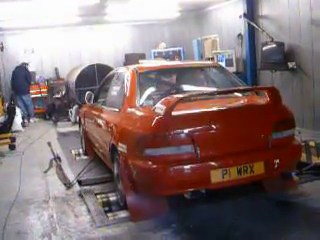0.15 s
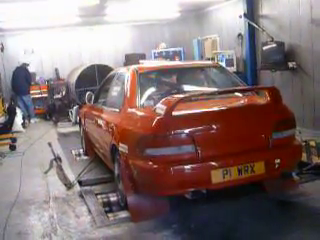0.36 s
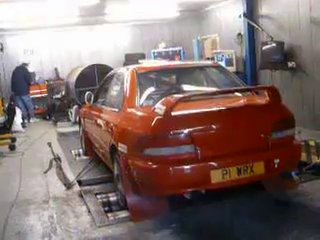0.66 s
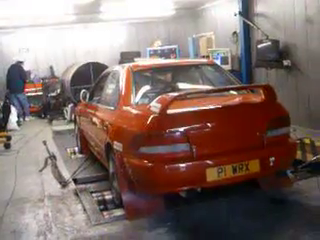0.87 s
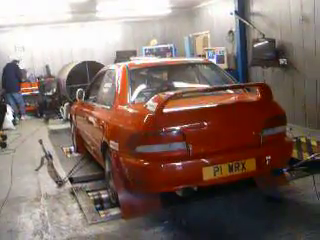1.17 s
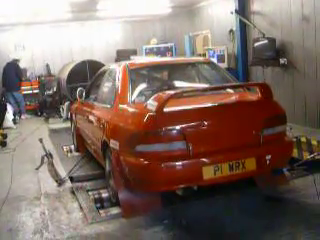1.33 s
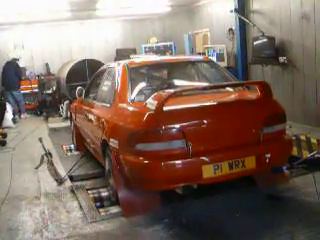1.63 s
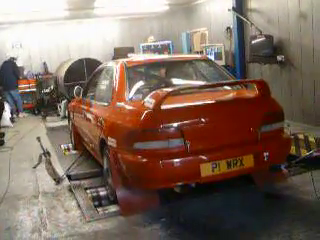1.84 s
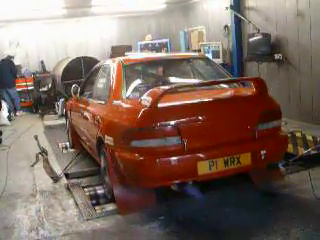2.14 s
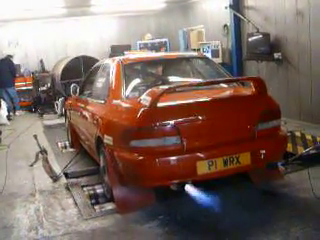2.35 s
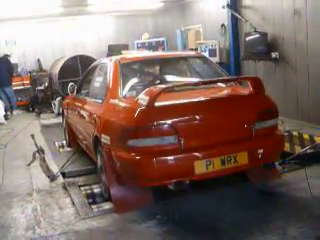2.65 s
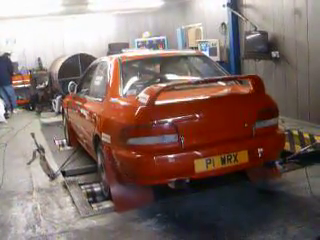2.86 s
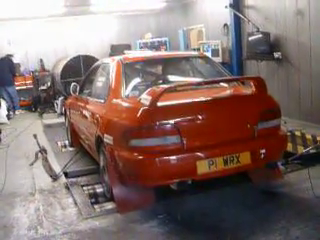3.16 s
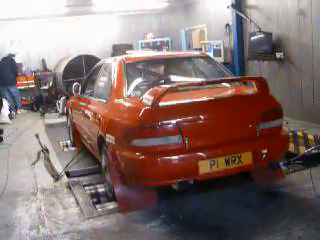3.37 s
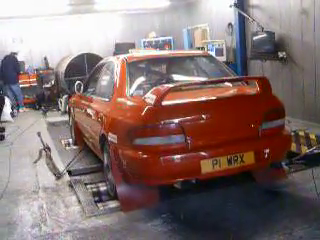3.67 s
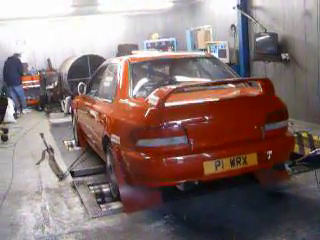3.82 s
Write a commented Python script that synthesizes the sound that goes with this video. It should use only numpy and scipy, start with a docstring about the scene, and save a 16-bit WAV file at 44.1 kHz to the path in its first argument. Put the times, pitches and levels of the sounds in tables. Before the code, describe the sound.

A car engine pulls on workshop rollers from 0 seconds, its uneven, raspy throb growing louder and rising slightly in pitch until 1.8. The throttle shuts and exhaust bangs erupt, with a huge crack at 2.0, a dense cluster to 2.5, weaker pops, and another violent bang at 3.1. From 3.2 the engine picks up quietly. Fan rush continues throughout; the close microphone clips on the loudest bangs.

```python
"""Flat-four on a dynamometer

A turbocharged flat-four pulls hard in a workshop, heard from behind the tailpipe. Its uneven firings
drive a throb of summed cycle harmonics, and a roar and rasp of noise bursts. The throttle shuts, unburnt
fuel bangs (pulse, pipe ring, crack) and the loudest peaks are clipped flat; two of the bangs whistle. The
engine picks up on a light throttle. A cooling fan of coloured noise and faint sines runs throughout."""
import sys
import numpy as np
from scipy import signal
from scipy.fft import rfft, irfft
from scipy.io import wavfile
from scipy.ndimage import uniform_filter1d, map_coordinates

SR = 44100
rng = np.random.default_rng(int(sys.argv[2]) if len(sys.argv) > 2 else 0)


def store_wav(level_fs):
    """Save 16-bit WAV to argv[1]."""
    pcm = np.round(np.clip(np.atleast_2d(level_fs), -1, 1) * 32767)
    wavfile.write(sys.argv[1], SR, pcm.T.astype(np.int16))


N = 176400


def undb(db):
    """Decibels to gain."""
    return 10 ** (np.asarray(db) / 20)


def unit(x):
    """Scale to rms 1."""
    return x / np.sqrt(np.mean(x ** 2))


def curve(table, t):
    """Every column after the first, joined by straight lines."""
    rows = np.array(table, float)
    return [np.interp(t, rows[:, 0], column) for column in rows.T[1:]]


def causal(db):
    """Minimum-phase response with these levels, so that it rings only after its cause."""
    cepstrum = irfft(np.log(undb(db)))
    half = len(cepstrum) // 2
    cepstrum[1:half] *= 2
    cepstrum[half + 1:] = 0
    return np.exp(rfft(cepstrum))


def colour(x, points):
    """Filter through (frequency [Hz], level [dB]) points, then scale to rms 1."""
    hz, db = np.array(points, float).T
    f = np.maximum(np.fft.rfftfreq(N, 1 / SR), 1)
    response = causal(np.interp(np.log(f), np.log(hz), db))
    return unit(irfft(rfft(x) * response, N))


def walk(hz):
    """Smooth random wander of about rms 1, heading for a new value hz times a second."""
    hold = int(SR / hz)
    steps = np.repeat(rng.standard_normal(N // hold + 1), hold)
    return unit(uniform_filter1d(steps, hold))[:N]


# Engine cycles of two crank turns each, for pull, coast and pick-up: (time [s], cycle rate [Hz])
PULL_RATE = [(0.0, 31.65), (0.2, 31.62), (0.4, 32.23), (0.7, 33.14), (1.0, 34.08), (1.3, 35.2),
             (1.6, 36.55), (1.72, 36.96), (1.84, 36.85)]
COAST_RATE = [(1.951, 36.21), (2.299, 34.98), (2.65, 33.14), (2.9, 31.64), (3.1, 30.56)]
PICKUP_RATE = [(3.25, 30.12), (3.45, 30.06), (3.6, 30.21), (3.8, 30.87), (4.0, 31.26)]
# One strong firing in the pull and one in the pick-up: (time [s], time [s])
STRONG_FIRING_S = (1.611, 3.309)
TIMING_JITTER_CYCLES = .0012


def crank(t):
    """Count engine cycles from the crank's rate, so that the strong firings fall near whole numbers."""
    rate, = curve(list(PULL_RATE) + list(COAST_RATE) + list(PICKUP_RATE), t)
    cycle = np.cumsum(rate) / SR
    offsets = np.unwrap(np.interp(STRONG_FIRING_S, t, cycle) % 1, period=1)
    # the correction slides from one anchor to the other during the coast
    correction = np.interp(t, [COAST_RATE[0][0], COAST_RATE[-1][0]], offsets)
    return cycle - correction + TIMING_JITTER_CYCLES * walk(120)


# The four firings of a cycle: (place [share of the cycle], then strength at load 1, 2, 3, 4, 5 [dB])
CYLINDERS = [(-.02, -0.5, -2, -7, -1, 0.5), (.24, -6, -9, 1.5, -3.5, -9), (.48, -2, -20, -13.5, -17, -12.5),
             (.75, -13.5, -2.5, -16.5, -11, -9.5)]
SHOCK_WIDTH_S, SHOCK_SCATTER_DB = .00003, 1
BURST_DECAY_CYCLES, BURST_FLOOR = 0.074, 0.21


def firings(cycle, load):
    """Four unequal firings per cycle: each is a sharp shock front, then a dying burst of gas."""
    mean_rate = np.mean(np.gradient(cycle)) * SR
    shocks, bursts = 0, BURST_FLOOR
    for place, *levels in CYLINDERS:
        strength = undb(np.interp(load - 1, np.arange(len(levels)), levels))
        from_front_s = ((cycle - place + .5) % 1 - .5) / mean_rate
        since_firing = (cycle - place) % 1
        shocks = shocks + strength * np.exp(-(from_front_s / SHOCK_WIDTH_S) ** 2)
        bursts = bursts + strength * np.exp(-since_firing / BURST_DECAY_CYCLES)
    return shocks * undb(SHOCK_SCATTER_DB * walk(60)), bursts


LOWEST_ORDER, HIGHEST_ORDER = 3, 28  # multiples of the cycle rate
# Throb balance, one row per order from the lowest up: (relative level at load 1, 2, 3, 4, 5 [dB])
ORDER_LEVELS = [(-25, -13, -17, -20, -23), (-20, -1.5, 3, -3.5, -8.5), (-0.5, -4, -3, -14.0, -14.0),
                (-41, -28, -14.5, -13.5, -21.5), (-9, -17.5, -13, -16.0, -25.0), (-0.5, 1.5, 0, 2.5, -5),
                (-18, -10.0, -1, -8.5, -10), (-19.5, -42, -35, -14, -27), (-21, -11, -10, -33, -25.0),
                (-30, -28, -12.0, -17, -10.5), (-10, -7.5, -4.5, -15, -23), (-21, -13, -35, -18.0, -16),
                (-11, -12, -21.5, -19, -25.0), (-24, -23, -14, -4, -19.0), (-10, -4, 1, -5.5, -16),
                (-21, -28.5, -37, -42, -26), (-26, -40, -27, -20, -26.0), (-17.0, -20.0, -27, -28, -17.0),
                (-36, -18, -5, 1, 1), (-20, -6, -10, -2, -19.5), (-16.0, -7.5, 0, -33, -29),
                (-21, -9, -5.0, -8.0, -35.0), (0.5, 3.5, 3.5, -20, -14.5), (-3.5, -10, -38, -32, -26),
                (-17, -14.0, -37, -22.0, -31), (-23.0, -28, -26, -33, -28)]
# Throb balance with the throttle shut: (order [multiple of the cycle rate], relative level [dB])
SHUT_ORDERS = [(3, 3), (4, 5), (5, -11), (8, -8.5), (16, -30), (23, -13), (28, -12)]
# Where in the cycle the throb gathers, by load: (place at load 1, 2, 3, 4, 5 [share of the cycle])
THROB_AT = (0.005, 0.2497, 0.257, 0.0094, 0.0047)
TONE_SMEAR, TONE_LEAD_CYCLES, TONE_FLUTTER_DB = 0.0698, .35, 0.23  # smear in radians per order squared


def tone(cycle, load, shut):
    """The throb: one pressure wave per cycle, gathered by load; the pipe delays its higher orders."""
    orders = np.arange(LOWEST_ORDER, HIGHEST_ORDER + 1)
    sizes = undb(np.column_stack([curve(SHUT_ORDERS, orders)[0], np.array(ORDER_LEVELS)]))
    sizes = sizes / np.sqrt(np.sum(sizes ** 2, axis=0) / 2)  # each column sums to rms 1
    load_steps = np.arange(len(THROB_AT)) + 1
    throb = np.zeros(N)
    for order, size in zip(orders, sizes):
        gather_phase = np.unwrap(2 * np.pi * order * np.array(THROB_AT))
        lag = np.interp(load, load_steps, gather_phase) + TONE_SMEAR * order ** 2
        level = shut * size[0] + (1 - shut) * np.interp(load, load_steps, size[1:])
        throb -= level * np.cos(2 * np.pi * order * (cycle + TONE_LEAD_CYCLES) - lag)
    return throb * undb(TONE_FLUTTER_DB * walk(90))


def gas(cycle, repeat, size=1200):
    """Turbulence: a share of its power repeats in every cycle, the rest is fresh noise."""
    pattern = rng.standard_normal(size)
    repeating = unit(map_coordinates(pattern, [cycle % 1 * size], order=3, mode="wrap"))
    share = np.clip(repeat, 0, 1)
    return np.sqrt(share) * repeating + np.sqrt(1 - share) * rng.standard_normal(N)


# Throttle while open: (time [s], load [1 light, 2 part, 3 high, 4 hard, 5 and above full])
LOAD = [(.35, 2.4), (.6, 3.02), (1.0, 3.34), (1.18, 4.22), (1.33, 4.16), (1.52, 5), (1.95, 6.1), (3.0, 1.2)]
# Throttle closing: (starts to shut [s], is shut [s], starts to open [s], is open [s])
THROTTLE_SHUT_S = (1.84, 1.88, 3.1, 3.22)
# Exhaust strength: (time [s], tone level [dB], gas roar level [dB], rasp level [dB])
EFFORT = [(0, -29, -29.5, -35.5), (.2, -25, -26.5, -32), (.4, -22.5, -22, -29), (.75, -16, -25, -25),
          (1.15, -14, -19.5, -25), (1.5, -13.5, -24.5, -26.5), (1.84, -15, -18, -29),
          (1.875, -34, -30, -35.5), (2.05, -30, -35, -39), (2.2, -36.5, -38.5, -55),
          (2.65, -37.5, -36, -49), (3.1, -38.5, -38.5, -45.5), (3.17, -37.5, -30, -37.5),
          (3.27, -31.5, -35.5, -44), (3.5, -28.5, -35, -39.5), (3.7, -25.5, -33, -38), (4, -27, -28.5, -35)]
# Colour of the gas roar: (frequency [Hz], relative level [dB])
ROAR_COLOUR = [(40, -36), (80, -36), (130, -7.5), (280, -2.5), (450, 1.5), (580, 5), (670, -4.5), (780, 16),
               (860, 3.5), (1000, -2.5), (1300, -31.5), (2500, -41)]
# Colour of the rasp: (frequency [Hz], relative level [dB])
RASP_COLOUR = [(600, -28), (950, -7), (1180, -1.5), (1320, -3), (1480, 1), (1570, 8), (1670, 5), (1850, -4),
               (2100, -9.5), (2320, 4), (2480, -10), (2850, 3), (3080, 3), (3280, 4.5), (3600, -9.5),
               (5000, -19.5), (8000, -16.5), (11000, -23.5)]
# Rasp off the floor and near walls: (delay [ms], level [dB])
RASP_ECHOES = [(3.3, -7.5), (10.3, -7.5), (14, -14.5)]
ROAR_REPEAT, RASP_REPEAT = 0.35, 0.84  # share of the turbulence that is the same in every cycle
SHOCK_DB = -5.5  # relative to the turbulence in the rasp


def engine(t):
    """Exhaust tone, gas roar and rasp, all locked to the engine cycle; floor and walls repeat the rasp."""
    cycle = crank(t)
    load, = curve(LOAD, t)
    shut = np.interp(t, THROTTLE_SHUT_S, [0, 1, 1, 0])
    tone_db, roar_db, rasp_db = curve(EFFORT, t)
    shocks, bursts = firings(cycle, load)
    roar = colour(np.sqrt(bursts) * gas(cycle, ROAR_REPEAT), ROAR_COLOUR)
    fronts = undb(SHOCK_DB) * unit(shocks) * (1 - shut)
    turbulence = unit(bursts * gas(cycle, RASP_REPEAT))
    rasp = colour(fronts + turbulence, RASP_COLOUR)
    echoes = sum(undb(db) * np.roll(rasp, int(ms * SR / 1000)) for ms, db in RASP_ECHOES)
    rasp = unit(rasp + echoes)
    throb = tone(cycle, load, shut)
    return undb(tone_db) * throb + undb(roar_db) * roar + undb(rasp_db) * rasp


# Colour of the fan's rush: (frequency [Hz], relative level [dB])
FAN_COLOUR = [(15, -47), (25, -20.5), (124, -2), (219, -2.5), (631, -7.5), (776, -15.5), (1340, -18),
              (1600, -18.5), (3130, -19), (4730, -24.5), (6130, -26), (9510, -26), (12000, -26.5),
              (15600, -61), (22000, -120)]
# Faint steady tones: (frequency [Hz], rms level [dB])
WHINE = [(5200, -63.5), (6316, -61.5), (9419, -62.5)]
FAN_DB, FAN_WANDER_DB = -38.5, 0.85


def fan(t):
    """The rush of the cooling fan and rollers, slowly wandering noise, with a whine of steady sines."""
    level = undb(FAN_DB + FAN_WANDER_DB * walk(4.4))
    rush = level * colour(rng.standard_normal(N), FAN_COLOUR)
    whine = sum(undb(db) * np.sqrt(2) * np.sin(2 * np.pi * hz * t) for hz, db in WHINE)
    return rush + whine


# Exhaust bangs: (time [s], pressure pulse level [dB], pulse width [ms], pipe ring level [dB],
# crack level [dB], crack decay [ms])
BANGS = [(1.802, -7, 0.95, -13, -22, 7.5), (1.816, -25, 0.42, -32, -14, 4.7),
         (1.837, -3, 0.59, -6.5, -20.5, 7.4), (2.0135, 8, 0.72, 2.5, -6, 3.6),
         (2.03, -17, 0.73, -24, -12, 9), (2.065, -21, 1, -30, -38, 2.9), (2.1225, -6, 0.83, -11, -18, 4.1),
         (2.219, -20.5, 1, -28, -36, 3), (2.253, -15, 0.94, -29, -36, 2.8),
         (2.278, -12.5, 0.75, -21, -34, 5.8), (2.3074, -6.5, 0.74, -11.5, -30, 3.7),
         (2.3361, -15, 1, -13, -30, 4.6), (2.3646, 0, 0.55, -16, -14, 4.3), (2.3758, -1, 0.96, -2, -22, 10),
         (2.428, -36, 1, -32, -33, 6), (2.4701, -5, 0.8, -10, -18, 8.1), (2.548, -30, 0.84, -22, -39, 3.4),
         (2.567, -34, 1, -16, -34, 5.7), (2.637, -22, 1, -22.5, -30.5, 7.2),
         (2.695, -19.5, 1, -12, -29.5, 13), (2.7358, -16, 0.38, -9, -17.5, 6.9),
         (2.75, -11.5, 1, -13.5, -29.5, 18), (2.781, -19.5, 0.95, -19, -41, 7.8),
         (2.88, -14, 1, -10, -29.5, 12), (2.9047, -29, 0.74, -8.5, -25, 7.9),
         (2.918, -21, 0.6, -14, -26, 4.6), (2.9926, -22, 0.82, -16, -15.5, 3.6),
         (3.064, -24, 1, -36, -44, 3), (3.1254, 5.5, 0.49, 3, -0.5, 3.14), (3.155, -16.5, 1, -16, -39, 5),
         (3.168, -30, 0.44, -26, -27, 2.3), (3.179, -32, 0.39, -16, -25.5, 3)]
# Tailpipe modes: (frequency [Hz], relative level [dB], 60 dB decay [ms])
PIPE_MODES = [(778, 2.5, 32.3), (876, 1.5, 28), (542, -12, 53), (1088, -8, 25), (243, -5.5, 35)]
# Colour of the crack: (frequency [Hz], relative level [dB])
CRACK_COLOUR = [(200, 4.5), (900, -2.5), (1900, 3), (2400, -4.5), (3200, 2.5), (4200, -11), (6000, -17),
                (9000, -18.5), (12000, -28)]
RING_BUILD_MS, CRACK_BUILD_MS, CRACK_LEAD_MS = 4.4, 0.79, 0.9
# a bang's suction ends in a steep front (steepening and edge in shares of the pulse width)
PULSE_LEAN, PULSE_STEEPEN, PULSE_EDGE = 0.43, 0.34, 0.17


def bangs(t, size=6000):
    """Each bang is a pressure pulse, a crack of gas and the ring of the tailpipe."""
    out = np.zeros(N)
    hiss = colour(rng.standard_normal(N), CRACK_COLOUR)
    for at, pulse_db, width_ms, ring_db, crack_db, decay_ms in BANGS:
        start = int(at * SR) - size // 10
        span = slice(start, start + size)
        seconds = t[span] - at
        ms = seconds * 1000
        after = np.maximum(ms, 0)
        burning = np.maximum(ms + CRACK_LEAD_MS, 0)

        # time in pulse widths, hurried through the steep front
        u = ms / width_ms
        u = u + PULSE_STEEPEN * (1 + np.tanh((u - .5) / PULSE_EDGE))
        pulse = (u ** 2 - 1) * np.exp(-u ** 2 / 2) * (1 + PULSE_LEAN * np.tanh(u))

        ring = np.zeros(size)
        for hz, db, t60_ms in PIPE_MODES:
            decay = np.exp(-np.log(1000) * after / t60_ms)
            ring -= undb(db) * np.sin(2 * np.pi * hz * seconds) * decay
        ring *= 1 - np.exp(-after / RING_BUILD_MS)

        crack = hiss[span] * (1 - np.exp(-burning / CRACK_BUILD_MS)) * np.exp(-burning / decay_ms)
        out[span] += undb(pulse_db) * pulse + undb(ring_db) * ring + undb(crack_db) * crack
    return out


# Jets of flame that whistle in two of the bangs: (time [s], frequency [Hz], level [dB])
JETS = [(2.0325, 2850, -15), (2.037, 2780, -19), (3.128, 1820, -11)]
JET_HALF_WIDTH_S, JET_WOBBLE_HZ = .002, 180


def squeal(t):
    """Jets of flame whistle for a few milliseconds: sines of wobbling pitch under a flat-topped swell."""
    out = np.zeros(N)
    for at, hz, db in JETS:
        phase = np.cumsum(hz + JET_WOBBLE_HZ * walk(500)) / SR
        swell = np.exp(-((t - at) / JET_HALF_WIDTH_S) ** 4)
        out += undb(db) * np.sqrt(2) * np.sin(2 * np.pi * phase) * swell
    return out


# Bangs off the near walls: (delay [ms], level [dB])
WALL_ECHOES = [(10.5, -27), (14, -16.5), (24, -52), (32, -25)]
ROOM_T60_S, ROOM_DB, ROOM_HZ = 0.21, -21.52, 3500


def workshop(x, t):
    """The room adds a few wall echoes and a short, dull tail of decaying noise."""
    tail_colour = [(50, -6), (150, 0), (ROOM_HZ / 2, -3), (ROOM_HZ, -6), (11000, -14)]
    tail = colour(rng.standard_normal(N), tail_colour)
    tail = tail * np.exp(-np.log(1000) * t / ROOM_T60_S) * np.clip(t / 0.0022, 0, 1)
    response = undb(ROOM_DB) * tail / np.sqrt(np.sum(tail ** 2))
    for ms, db in WALL_ECHOES:
        response[int(ms * SR / 1000)] += undb(db)
    return x + signal.fftconvolve(x, response)[:N]


def scene():
    """Engine, fan and bangs at one microphone; only the bangs and whistles excite the room."""
    t = np.arange(N) / SR
    return (engine(t) + fan(t) + workshop(bangs(t) + squeal(t), t))[None]


LOW_HZ, DULL_HZ, CUT_HZ, TOP_HZ = 50, 10500, 12161, 15800
CLIP_LEVEL = .705


def record(dry):
    """Thin the deep bass, low-pass, clip the peaks flat, low-pass again."""
    thin = signal.sosfilt(signal.butter(2, LOW_HZ, "high", fs=SR, output="sos"), dry)
    dull = signal.sosfilt(signal.butter(10, DULL_HZ, fs=SR, output="sos"), thin)
    dull = signal.sosfilt(signal.ellip(8, .2, 70, CUT_HZ, fs=SR, output="sos"), dull)
    clipped = np.clip(dull, -CLIP_LEVEL, CLIP_LEVEL)
    return signal.sosfilt(signal.ellip(8, .2, 70, TOP_HZ, fs=SR, output="sos"), clipped)


dry = scene()
out = record(dry)
store_wav(out)
```